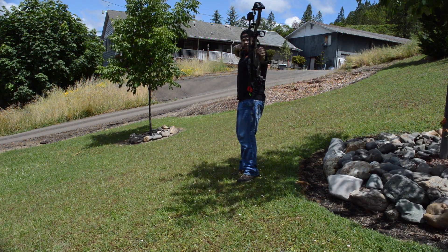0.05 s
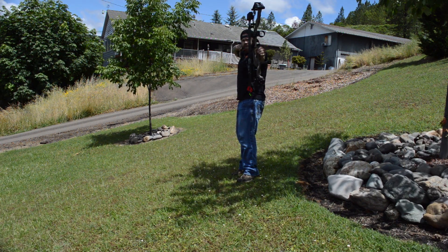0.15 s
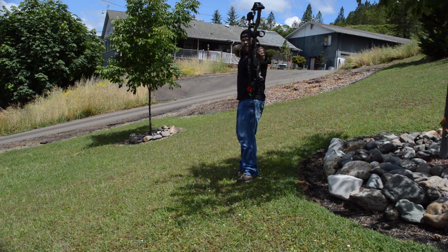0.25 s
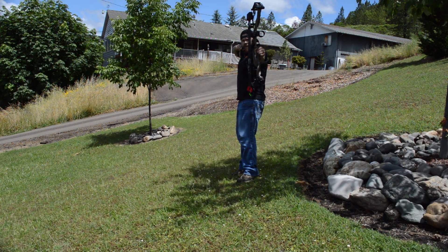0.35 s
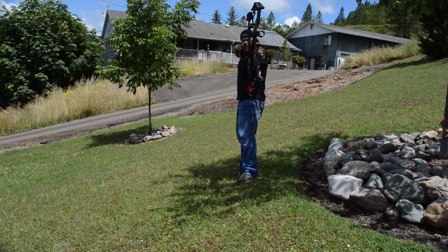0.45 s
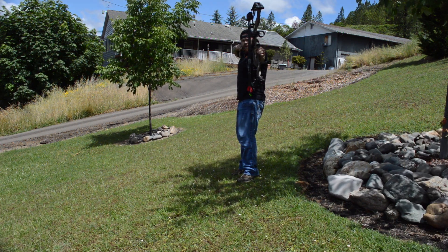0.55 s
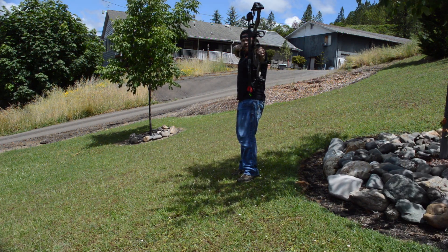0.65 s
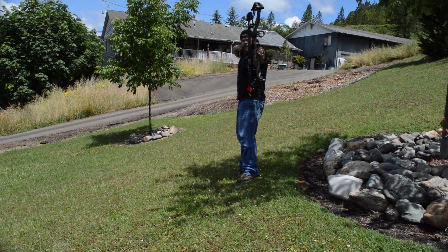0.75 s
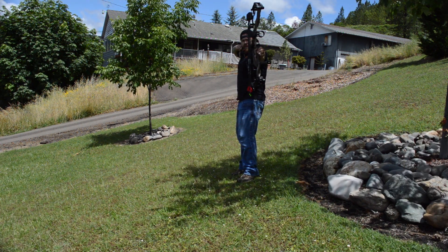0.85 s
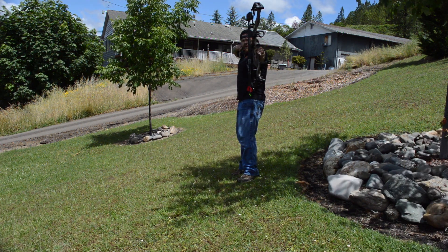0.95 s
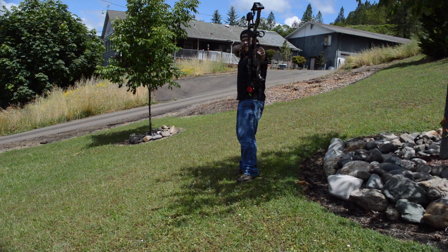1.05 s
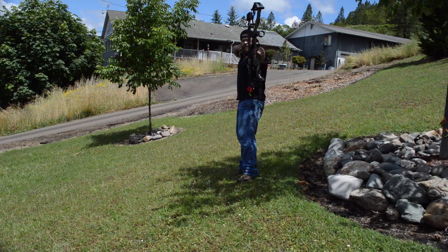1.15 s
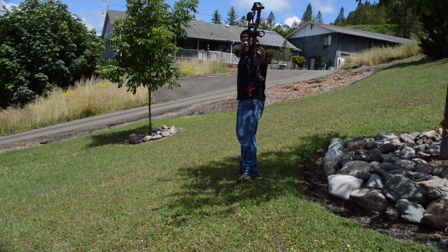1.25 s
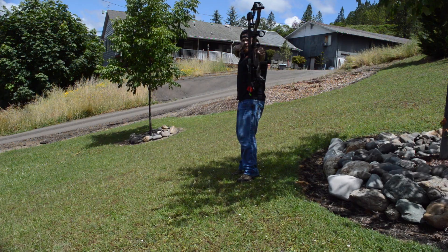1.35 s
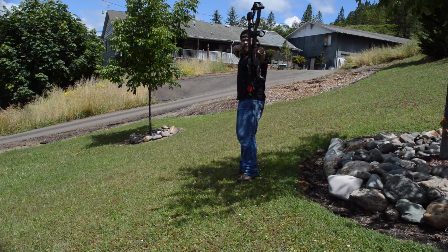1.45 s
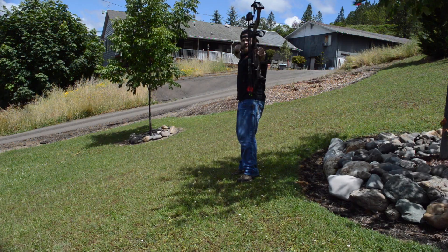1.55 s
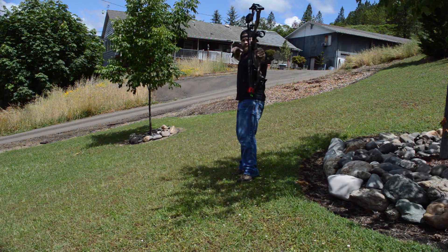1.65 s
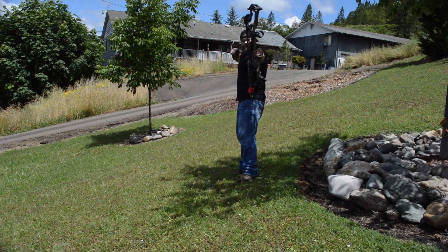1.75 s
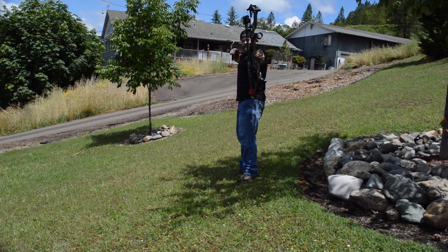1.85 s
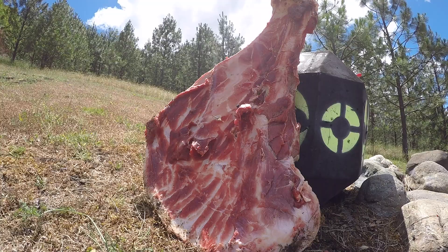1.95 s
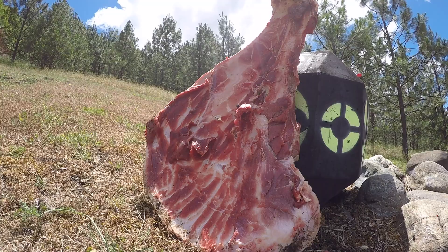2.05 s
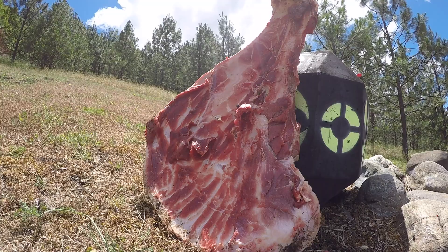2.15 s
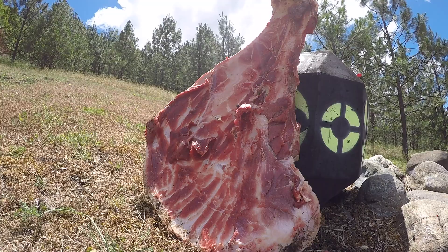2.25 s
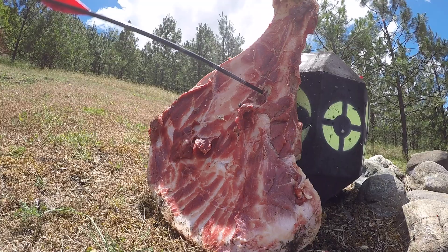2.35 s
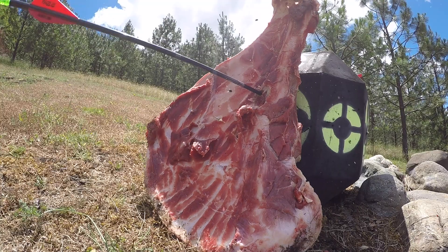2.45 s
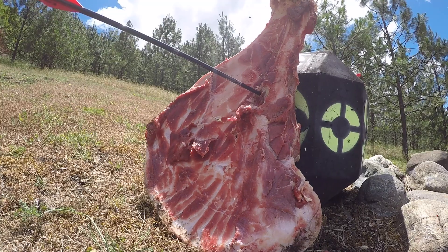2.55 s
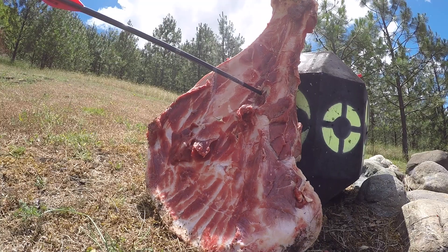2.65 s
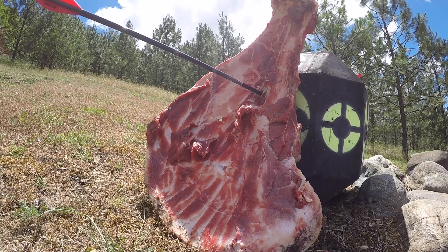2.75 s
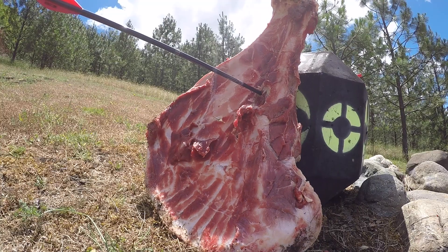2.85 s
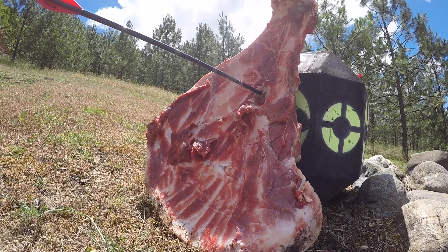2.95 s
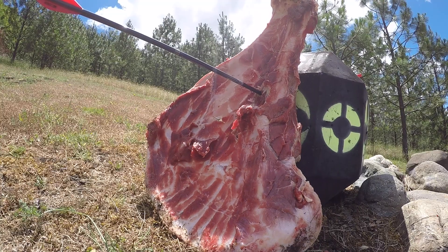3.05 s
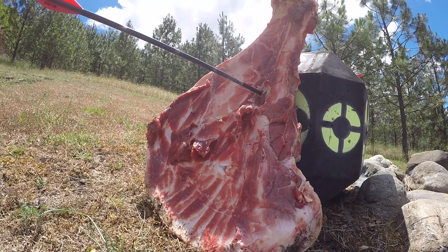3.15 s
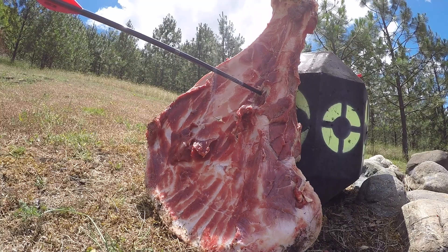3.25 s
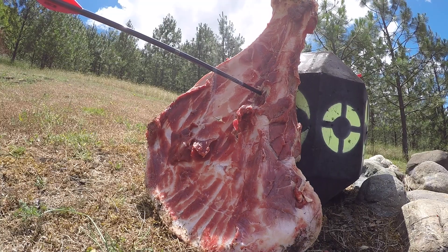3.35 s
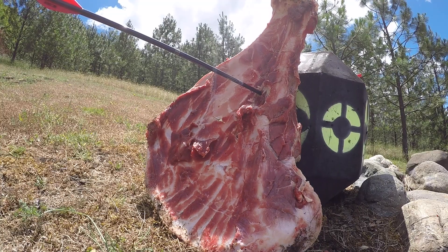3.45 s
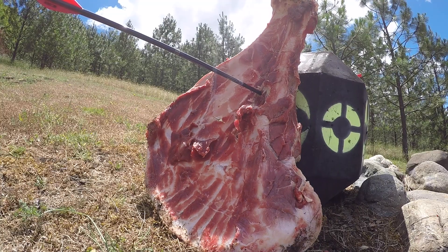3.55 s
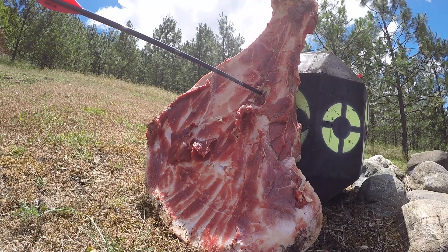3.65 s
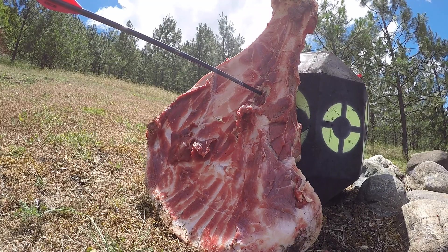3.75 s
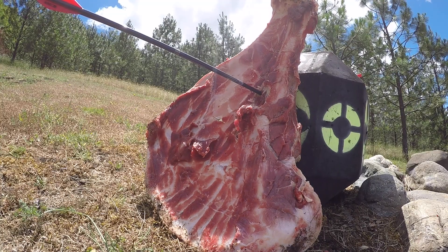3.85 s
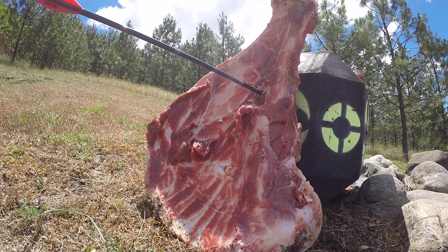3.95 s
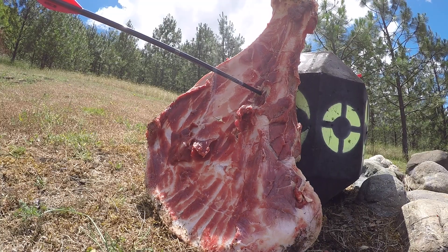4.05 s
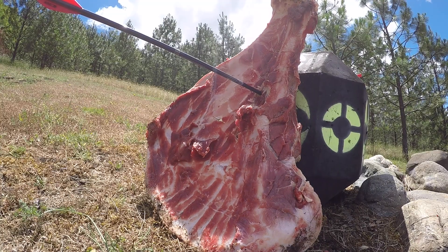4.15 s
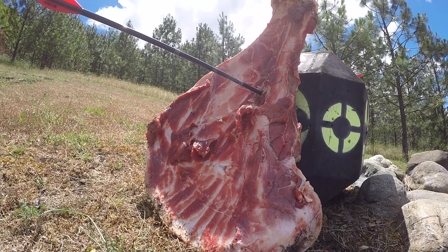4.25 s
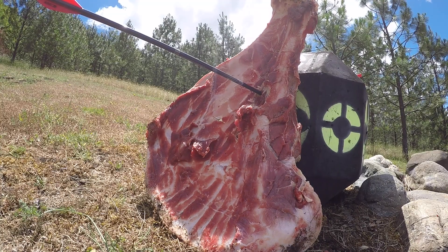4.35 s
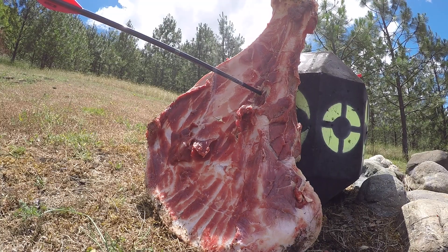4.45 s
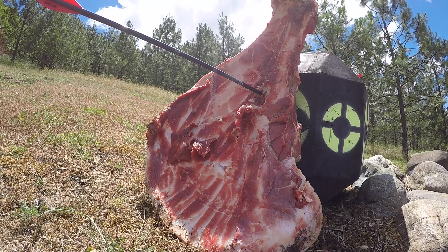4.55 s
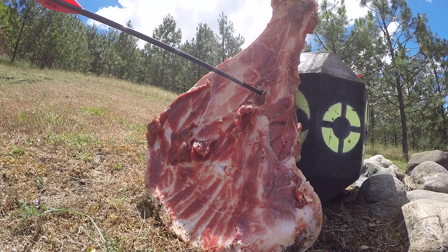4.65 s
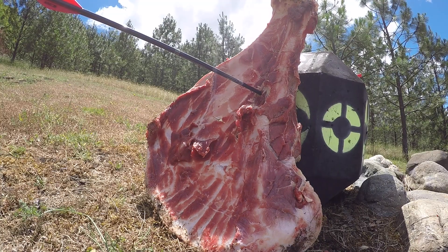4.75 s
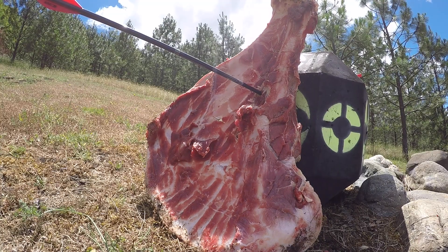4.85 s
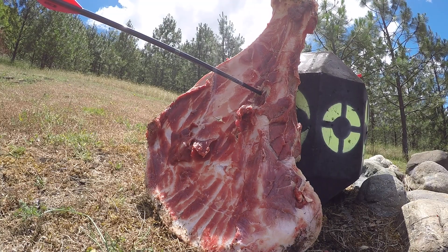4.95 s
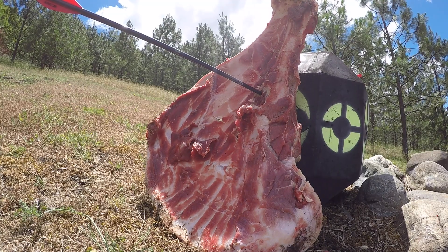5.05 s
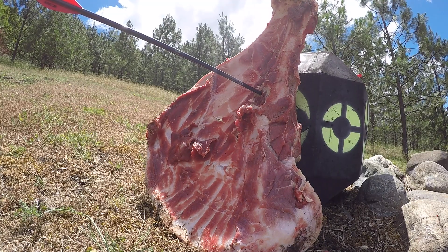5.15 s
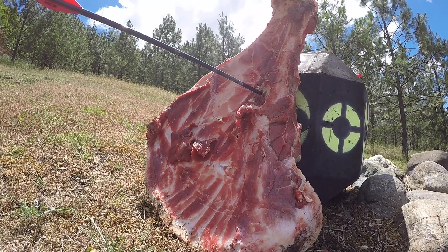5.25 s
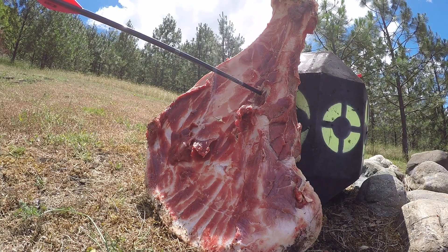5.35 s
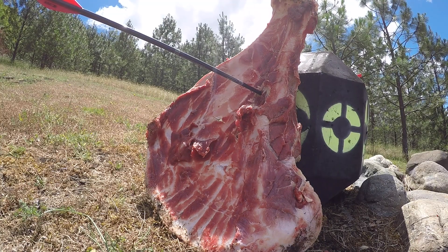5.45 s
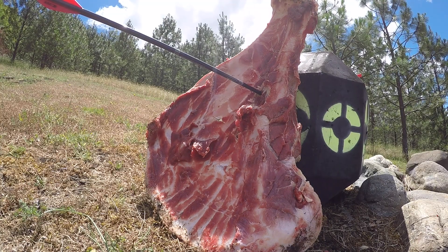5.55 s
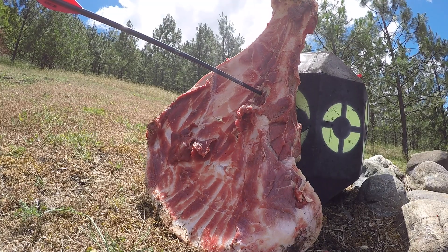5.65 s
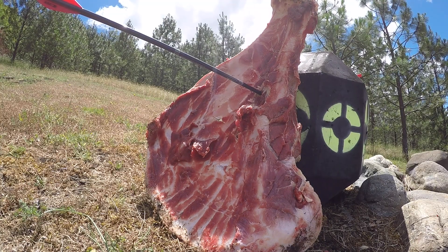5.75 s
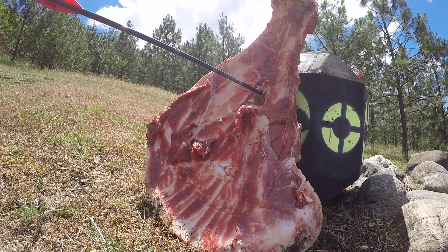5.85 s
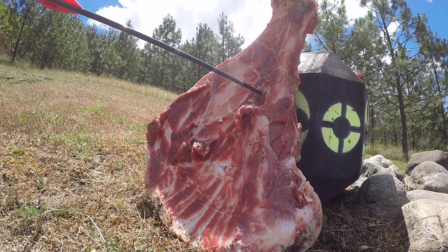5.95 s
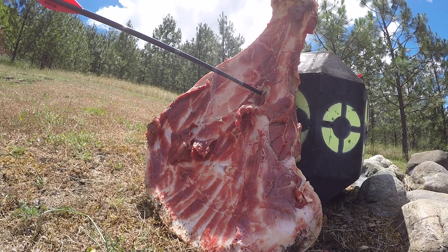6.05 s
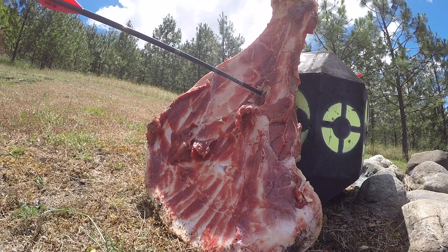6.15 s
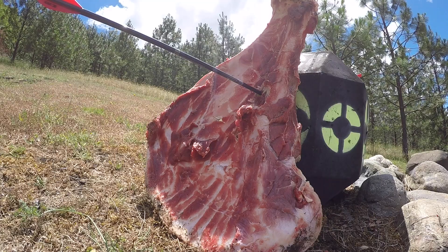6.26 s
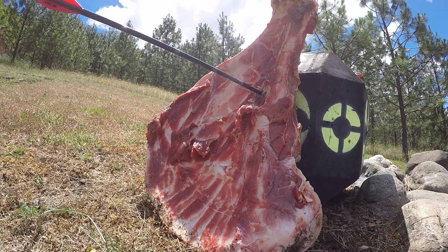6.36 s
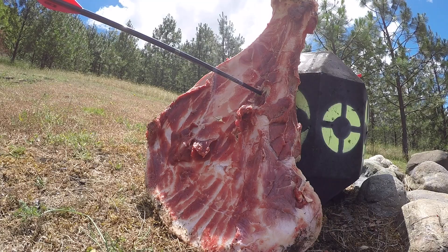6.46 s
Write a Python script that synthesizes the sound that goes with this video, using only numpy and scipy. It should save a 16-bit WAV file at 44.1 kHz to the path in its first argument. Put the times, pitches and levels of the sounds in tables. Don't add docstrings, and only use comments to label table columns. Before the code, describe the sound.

A quiet lawn opens with soft hiss and high three-pulse cricket chirps about four times a second, some fainter and farther. A tiny knock at 1.3 seconds precedes the close bow release at 1.6: a sharp clack, short ringing limbs and a tearing string whip, gone quickly. A small dry far smack comes at 2.01. At 2.03 the sound cuts to a fuller field beside the target. A faint distant release at 2.11 leads into swelling arrow hiss, then at 2.38 an enormous, clipped crack with bony ring and low fleshy thud, and a diffuse tree echo until 2.6. The background ducks and recovers by 3.2. Steady cricket shimmer continues; a fly buzzes faintly around 3.1-3.6 and 4.5-5. Faint birds whistle near 4, 4.4 and from 5.95. Low wind buffets thump the microphone, strongest from 5.1 to 6.4, continuing to the end at 6.5.

```python
import sys
import numpy as np
from scipy import signal
from scipy.fft import rfft, irfft
from scipy.io import wavfile
from scipy.ndimage import uniform_filter1d

SR = 44100
rng = np.random.default_rng(int(sys.argv[2]) if len(sys.argv) > 2 else 0)


def transcribe(signal):
    frames = np.atleast_2d(signal).T
    limited = np.clip(frames, -1, 1)
    pcm = np.round(limited * 32767).astype(np.int16)
    wavfile.write(sys.argv[1], SR, pcm)


def natural_amplitude(level_db):
    exponent = np.asarray(level_db, float) / 20
    return 10 ** exponent


N = 287091
T = np.arange(N) / SR
CUT_S, RELEASE_S, SMACK_S = 2.0315, 2.115, 2.3825
STROKE_S = .018

# (frequency [Hz], level [dB per Hz])
LAWN_COLOUR = [(15, -51), (25, -11.5), (64, -14.5), (185, -15.5), (212, -14), (476, -17.5), (714, -20),
               (818, -19.5), (1790, -23), (2220, -23), (16000, -25.5)]
# (frequency [Hz], level [dB])
HUM = [
    (60, -75),
    (120, -80),
]
# (frequency [Hz], level [dB per Hz])
FIELD_COLOUR = [(100, -1), (200, -3), (400, -10), (800, -14), (1600, -20.5), (3200, -23), (6400, -27.5),
                (9000, -32), (15000, -34.5), (15600, -50.5)]
# (time [s], level [dB])
FIELD_GAIN = [
    (2.03, -59.5),
    (2.38, -60.5),
    (2.62, -66),
    (3.0, -62),
    (3.2, -58.5),
    (6.51, -60),
]
# (centre [s], buffeting [dB], half length [s], rumble [dB])
GUSTS = [(2.12, -58, 0.19, -65), (2.44, -38, 0.028, -47), (2.54, -37.5, 0.059, -49),
         (2.67, -51.5, 0.068, -71), (2.82, -63, 0.062, -70), (3.25, -56.5, 0.1, -67),
         (3.5, -47, 0.048, -65.5), (3.76, -63, 0.057, -74.5), (4.25, -58.5, .08, -64.5),
         (4.65, -51.5, 0.037, -57), (4.92, -49.5, .04, -66), (5.075, -35, 0.035, -56),
         (5.16, -35, 0.031, -53.5), (5.21, -36, 0.011, -46), (5.245, -28, 0.027, -43.5),
         (5.34, -37, 0.037, -60), (5.44, -35, 0.049, -58.5), (5.535, -28, 0.026, -52.5),
         (5.655, -27.5, 0.044, -50.5), (5.73, -28, 0.032, -55.5), (5.825, -45, .015, -54.5),
         (5.88, -50, 0.022, -54), (5.94, -45, .02, -66), (5.99, -32.5, 0.017, -50), (6.03, -44, .02, -58),
         (6.145, -27.5, 0.026, -47), (6.21, -31, 0.043, -56), (6.36, -38.5, 0.074, -78.5),
         (6.48, -49.5, 0.045, -60)]
# (start [s], end [s])
TOP_LOST = [
    (5.2, 5.265),
    (5.585, 5.65),
    (5.695, 5.735),
    (6.12, 6.17),
]
# (time [s], peak [dB], rise [s], t60 [s], centre [Hz], width [Hz])
GROUND_ROLL = [
    (2.034, -53, 0.015, .4, 209, 220),
    (2.12, -52, 0.011, .45, 200, 200),
    (2.42, -44.5, .004, .15, 200, 120),
    (2.5, -48.5, .02, .35, 210, 140),
]

# (time [s], level [dB])
CHORUS_LEVEL = [(2.03, -67), (2.3, -67), (2.6, -76.5), (2.8, -74.5), (2.95, -77.5), (3.05, -72), (3.3, -69),
                (4.6, -67.5), (6.51, -67)]
# (first stroke [s], level [dB])
CHIRPS = [(-.021, -64.5), (.251, -64), (.513, -64), (.77, -61), (1.04, -63.5), (1.295, -64), (1.714, -63.5),
          (1.962, -65.5)]
# (first stroke [s], level [dB], pitch [Hz])
NEIGHBOUR = [
    (.085, -70.5, 5460),
    (.414, -66, 5470),
    (.785, -71, 5580),
    (1.312, -74, 5300),
]
# (stroke [s], level [dB], pitch [Hz])
CLOSE_STROKES = [
    (2.095, -57, 5138),
    (2.154, -52, 5280),
    (2.17, -67, 5400),
]
# (time [s], length [s], from [Hz], to [Hz], level [dB])
BIRD_NOTES = [(0, .065, 4280, 3020, -77), (3.922, .022, 3950, 3950, -73), (3.97, .045, 3450, 3450, -72.5),
              (4.018, 0.031, 3400, 3480, -67), (4.047, 0.03, 3560, 3540, -71.5),
              (3.983, .045, 3346, 2950, -73), (4.045, .035, 2950, 3050, -75),
              (4.32, 0.032, 2460, 2460, -76), (4.42, .03, 2350, 2560, -78), (4.447, .025, 2944, 2795, -78),
              (5.952, .035, 4600, 3150, -69.5), (5.986, .15, 3200, 3160, -71.5),
              (6.168, .015, 3300, 3250, -73), (6.305, .03, 3010, 3080, -68), (6.487, .03, 3780, 3670, -69)]
# (time [s], pitch [Hz], level [dB])
BIRD_SLUR = [(4.065, 3410, -90), (4.08, 3020, -75), (4.095, 2680, -73.5), (4.115, 2520, -77),
             (4.145, 2550, -77), (4.16, 2680, -73.5), (4.177, 2980, -75), (4.192, 3400, -90)]
# (time [s], wing beat [Hz], level [dB])
FLY_PASSES = [
    [(2.95, 228.7, -88.5), (3.1, 227.8, -80.5), (3.21, 228, -74.5), (3.275, 225, -83), (3.33, 221, -71),
     (3.42, 215.4, -74), (3.47, 219, -78.5), (3.53, 223, -72.5), (3.7, 223.7, -88)],
    [(4.42, 216.7, -89), (4.52, 218.2, -76.5), (4.61, 217, -76.5), (4.66, 225.4, -74.5), (4.72, 231.3, -76),
     (4.77, 223, -84), (4.85, 227, -76), (4.9, 222, -83), (4.96, 215.3, -76.5), (5.05, 214, -90)],
]
WING_PARTIALS_DB = [0, 6, -1, -1.5, 0, 0, -6, -5, -10]

# (time [s], peak [dB], rise [s], t60 [s], centre [Hz], width [Hz])
BOW_NEAR = [(1.308, -56.5, .001, .03, 930, 600), (1.5765, -44, 0.00034, 0.008, 6000, 14000),
            (1.577, -47.5, 0.0026, 0.18, 2900, 12100), (1.587, -50, .001, .02, 8500, 1500),
            (1.5958, -33, 0.00067, 0.033, 2500, 5000), (1.598, -18, 0.00047, 0.019, 3000, 7000),
            (1.602, -24, 0.0007, 0.045, 1210, 1500), (1.688, -54.5, 0.0022, .06, 4000, 7000),
            (1.74, -46.5, .0006, 0.047, 1060, 1500), (1.74, -53, .0004, 0.014, 2700, 2200),
            (1.6, -41, .002, 0.071, 400, 300), (1.598, -37.5, 0.0018, 0.051, 124, 110),
            (1.62, -59.5, 0.057, 0.89, 1110, 2200), (1.78, -60, 0.00802, 0.12965, 750, 400)]
# (time [s], peak [dB], rise [s], t60 [s], centre [Hz], width [Hz])
STRING_SLAP = [
    (1.6025, -31.5, .001, .035, 7000, 6000),
    (1.6102, -38, .0004, 0.012, 2200, 3000),
    (1.607, -39, .001, .03, 4200, 2000),
    (1.628, -38, .002, 0.036, 3000, 1500),
    (1.637, -39, .004, 0.046, 7200, 2500),
    (1.646, -53, .003, 0.041, 1200, 1500),
]
# (time [s], frequency [Hz], level [dB], rise [s], t60 [s], first swing [+1/-1])
LIMBS_NEAR = [(1.6005, 776, -15, 0.0027, 0.026, 1), (1.6015, 1454, -14.5, 0.0028, 0.03, -1),
              (1.6, 1063, -19, 0.0023, 0.039, 1), (1.598, 635, -21.5, .001, 0.034, 1),
              (1.598, 320, -26, 0.0012, 0.044, 1), (1.598, 2190, -27, .0005, .045, -1),
              (1.6, 1741, -31.5, .001, .05, 1), (1.598, 2800, -28, .0005, 0.042, 1),
              (1.598, 967, -30.5, 0.0011, .035, -1), (1.602, 1209, -24, .002, .025, 1),
              (1.599, 1200, -19, 0.0009, 0.025, 1), (1.6095, 1800, -30, .0008, .025, -1),
              (1.626, 3500, -38, .004, 0.046, 1), (1.598, 3400, -22, .0004, .02, 1)]
# (time [s], level [dB])
WHIP_LEVEL = [(1.6, -41), (1.612, -40), (1.626, -35), (1.635, -39.5), (1.646, -51), (1.66, -58.5),
              (1.7, -64), (1.76, -73)]
# (frequency [Hz], level [dB per Hz])
WHIP_COLOUR = [(88, -49), (150, -23), (275, -2), (923, -10.5), (1080, -4.5), (1240, -12), (2180, -9.5),
               (2400, -10.5), (16000, -19)]
# (time [s], peak [dB], rise [s], t60 [s], centre [Hz], width [Hz])
HIT_FAR = [
    (2.0125, -32, 0.0002746, 0.0095, 4030, 9000),
    (2.0125, -38.5, 0.00041, 0.02, 900, 2010),
    (2.0165, -52, 0.0005916, 0.0297, 4500, 3000),
    (2.0255, -36, 0.0018, 0.046, 4400, 2200),
    (2.027, -49, 0.002, .05, 9000, 9000),
]
# (time [s], frequency [Hz], level [dB], rise [s], t60 [s], first swing [+1/-1])
BONE_FAR = [
    (2.0126, 2680, -28, 0.00028, 0.0067, -1),
    (2.0126, 4310, -14.5, 0.00026, 0.0042, -1),
    (2.0126, 7700, -28.5, 0.00022, 0.0053, 1),
    (2.0126, 7460, -39, 0.00024, 0.0093, 1),
    (2.0126, 13500, -32.5, .0003, .006, 1),
    (2.0126, 5780, -28.5, .0002, .007, 1),
]

# (time [s], peak [dB], rise [s], t60 [s], centre [Hz], width [Hz])
BOW_FAR = [
    (2.1132, -45, 0.001, 0.094, 2770, 5894),
    (2.1135, -50, .0007, .03, 9500, 8000),
    (2.114, -43, 0.0017, 0.036, 248, 410),
    (2.145, -53, 0.0038, 0.073, 1493, 900),
    (2.255, -58, .002, 0.033, 1090, 900),
    (2.16, -56, .003, .04, 3500, 4900),
    (2.25, -59, 0.0066, .1, 3235, 400),
]
# (time [s], frequency [Hz], level [dB], rise [s], t60 [s], first swing [+1/-1])
LIMBS_FAR = [(2.114, 716, -42.5, .002, .045, 1), (2.1142, 1502, -40.5, .001, .04, -1),
             (2.1135, 1100, -44, .001, .035, 1), (2.116, 3295, -40, .001, .03, 1),
             (2.114, 2890, -41, .0007, .03, -1), (2.113, 100, -27.5, .003, .04, -1),
             (2.254, 680, -49, .002, .04, 1), (2.254, 1060, -45, .002, .04, 1),
             (2.254, 1490, -47, .002, .035, -1), (2.143, 2200, -56, .02, .25, 1),
             (2.114, 2073, -42, .001, .03, 1), (2.115, 2610, -43, .001, .03, -1),
             (2.117, 3945, -44, .001, .035, 1), (2.114, 4313, -46, .0007, .03, -1),
             (2.114, 5265, -45, .001, .035, 1), (2.114, 6380, -44, .0007, .02, -1),
             (2.1135, 8247, -44, .0007, .02, 1), (2.1135, 8750, -45, .0007, .02, -1)]
# (frequency [Hz], level [dB per Hz])
FLIGHT_COLOUR = [(240, -27), (400, -2.5), (553, -12), (645, -4.5), (1510, -9.5), (1630, -11), (7170, -8.5),
                 (14600, -19.5), (16000, -35)]
# (time [s], peak [dB], rise [s], t60 [s], centre [Hz], width [Hz])
HIT_NEAR = [(2.3824, 5, 0.00035, 0.01, 3980, 4000), (2.3824, 1.5, .0008, 0.0091, 11200, 8003),
            (2.386, -5, 0.00045, 0.005, 4500, 7000), (2.3826, -5.5, 0.00032, 0.013, 1510, 700),
            (2.3905, -23, .0004, .009, 2800, 2500), (2.393, -22, .0004, .009, 4200, 3500),
            (2.394, -33, .001, .025, 2000, 2000), (2.4025, -38, .0004, .008, 3500, 4000),
            (2.409, -34.5, .002, 0.024, 4700, 1800), (2.436, -45.5, .002, .03, 1750, 400),
            (2.463, -48, .002, .025, 2700, 600), (2.65, -60.5, .04, 0.46, 4250, 1500),
            (2.73, -61, .02, .4, 3890, 1499)]
# (time [s], frequency [Hz], level [dB], rise [s], t60 [s], first swing [+1/-1])
SLAB = [(2.3843, 215, 4, .0023, .045, -1), (2.3876, 44, 3.6, .003, .05, 1), (2.376, 14, -7, .001, .1, -1),
        (2.3831, 341, 4, .018, .04, -1), (2.3845, 443, -11.5, .0005, .03, 1),
        (2.384, 950, -18, .001, .03, 1), (2.384, 750, -14, .001, .02, 1), (2.384, 575, -24, .001, .02, -1),
        (2.384, 1200, -6.5, .0005, .02, 1), (2.401, 41, -19, .008, .25, -1),
        (2.3975, 95, -15, .0015, .03, -1), (2.3875, 125, -17, .003, .06, 1),
        (2.384, 1340, -19, .0005, .015, -1)]
# (time [s], frequency [Hz], level [dB], rise [s], t60 [s], first swing [+1/-1])
BONE_NEAR = [(2.3824, 2417, 3, 0.00037, 0.013, 1), (2.3824, 3310, 2.5, 0.00028, 0.013, -1),
             (2.3825, 4334, 5, .0003, 0.011, 1), (2.3829, 4150, -0.5, 0.00033, 0.01, 1),
             (2.3825, 5410, 3, 0.00026, 0.014, -1), (2.3825, 6320, 1, .0003, 0.014, 1),
             (2.3825, 7420, 2, .0003, 0.013, -1), (2.3826, 2660, -5, .0004, 0.013, -1),
             (2.3826, 1870, -9, .0003, 0.011, -1), (2.3826, 8114, 1, 0.00026, 0.011, 1),
             (2.3825, 6010, -2.5, .0003, 0.013, -1), (2.3826, 3630, -8, .0003, 0.0058, 1),
             (2.3826, 9200, -5, .0005, 0.013, 1), (2.3826, 13900, -2, .0006, .007, -1),
             (2.3826, 12700, -5.5, .0006, .01, 1), (2.3826, 4900, -3, .0003, 0.0085, -1)]
# (time [s], level [dB])
ECHO_LEVEL = [
    (2.4, -53),
    (2.42, -49.5),
    (2.58, -52),
    (2.62, -68.5),
    (2.7, -83),
]
# (frequency [Hz], level [dB per Hz])
ECHO_COLOUR = [(88, -29), (150, -2), (240, -2), (422, -13.5), (494, -11), (637, -17.5), (1720, -15.5),
               (10400, -26), (14800, -34), (16000, -48)]


def column(table, k=1, outside=-150.):
    rows = np.array(table, float)
    return np.interp(T, rows[:, 0], rows[:, k], left=outside, right=outside)


def walk(rate):
    hold = max(int(SR / rate), 1)
    steps = rng.standard_normal(N + 1)[:N // hold + 1]
    return 1.2 * uniform_filter1d(np.repeat(steps, hold)[:N], hold)


def coloured(shape, flicker_db=0., rate=10.):
    hz = np.maximum(np.arange(N // 2 + 1) * SR / N, 1)
    rows = np.array(shape, float)
    level_db = np.interp(np.log(hz), np.log(rows[:, 0]), rows[:, 1], left=-80, right=-90)
    spectrum = rfft(rng.standard_normal(N)) * natural_amplitude(level_db)
    if flicker_db:
        out = np.zeros(N)
        for octave in range(4, 15):
            share = np.clip(1 - abs(np.log2(hz) - octave), 0, 1)
            out += irfft(spectrum * share, N) * natural_amplitude(flicker_db * walk(rate))
    else:
        out = irfft(spectrum, N)
    return out / np.std(out)


def add(out, s, piece):
    i = max(int(s * SR), 0)
    out[i:i + len(piece)] += piece[:max(N - i, 0)]


def swell(rise, t60, size=22050):
    t = np.arange(size) / SR
    return t, (1 - np.exp(-t / rise)) * 1000. ** (-t / t60)


def scattered(x, rise, t60, size):
    scatter = rng.standard_normal(size) * swell(rise, t60, size=size)[1]
    return signal.fftconvolve(x, scatter / np.linalg.norm(scatter))[:N]


def knocks(table):
    out = np.zeros(N)
    for s, db, rise, t60, hz, width in table:
        b, a = signal.iirpeak(hz, hz / width, SR)
        noise = signal.lfilter(b, a, rng.standard_normal(16000))
        noise = signal.lfilter(b, a, noise)[1000:]
        fade = swell(rise, t60, size=len(noise))[1]
        add(out, s, natural_amplitude(db) * noise / np.std(noise) * fade)
    return out


def rings(table):
    out = np.zeros(N)
    for s, hz, db, rise, t60, sign in table:
        t, fade = swell(rise, t60)
        add(out, s, np.sign(sign) * natural_amplitude(db) * fade * np.sin(2 * np.pi * hz * t))
    return out


def mains_hum():
    hum = np.zeros(N)
    for hz, db in HUM:
        hum += np.sqrt(2) * natural_amplitude(db + 1.7 * walk(6.1)) * np.sin(2 * np.pi * hz * T)
    return hum


def lawn_noise():
    hiss = natural_amplitude(-67.5) * coloured(LAWN_COLOUR)
    return hiss + natural_amplitude(-80.5) * coloured([(4600, -15), (5300, -15.0), (5900, -16.5)])


def field_noise():
    return natural_amplitude(column(FIELD_GAIN)) * coloured(FIELD_COLOUR, flicker_db=-0.3, rate=8.0)


def wind():
    push, rough = natural_amplitude(column(FIELD_GAIN) + 3.5), natural_amplitude(column(FIELD_GAIN) - 1)
    for s, db, half, rumble_db in GUSTS:
        gust = np.exp(-abs(np.arange(-2 * half, 2 * half, 1 / SR) / half) ** 3)
        add(push, s - 2 * half, natural_amplitude(db) * gust)
        add(rough, s - 2 * half, natural_amplitude(rumble_db) * gust)
    buffet = coloured([(15, -10), (25, -1), (45, 0), (62, -5.5), (88, -22)])
    power = uniform_filter1d(uniform_filter1d(buffet ** 2, size=1200), size=1200)
    buffet = buffet / np.sqrt(0.33 + power)
    rumble_colour = [(55, -10.5), (78, -1), (120, -3), (170, -12), (280, -27)]
    rumble = coloured(rumble_colour, flicker_db=4, rate=25)
    return push * buffet + rough * rumble


def crickets(strokes, fall_hz):
    out, t = np.zeros(N), np.arange(int(STROKE_S * SR)) / SR
    for s, db, hz in strokes:
        pitch_hz = hz + fall_hz * (.36 - (t / STROKE_S) ** 1.8)
        tone = np.sin(2 * np.pi * np.cumsum(pitch_hz) / SR)
        add(out, s - STROKE_S / 2, 1.3 * natural_amplitude(db) * np.sin(np.pi * t / STROKE_S) ** .7 * tone)
    blurred = scattered(out, .003, 0.13, 2000)
    return out * natural_amplitude(walk(200)) + .3 * blurred


def chorus(count=9):
    strokes = []
    for start, pace, hz, far in rng.random((count, 4)):
        for s in np.arange(CUT_S - .3 * start, N / SR, .2 + .12 * pace):
            strokes += [(s + .034 * k, -8 * far, 5120 + 420 * hz) for k in range(3 + int(2 * pace))]
    near = crickets(strokes, fall_hz=650)
    high_period_s = .253
    starts = np.arange(4.83 - 9 * high_period_s, N / SR, high_period_s)
    high = crickets([(s + .022 * k, -5.5, 5900) for s in starts for k in range(5)], fall_hz=220)
    blur = coloured([(4500, -25.5), (4950, -6.5), (5400, -2.0), (5700, -4.5), (6000, -22.5)])
    swell_db = 0.43 * np.cos(2 * np.pi * (T - 4.8) / .5)
    mix = .65 * near / np.std(near[T > CUT_S]) + 0.76 * blur + high
    return natural_amplitude(column(CHORUS_LEVEL) + swell_db) * mix


def near_crickets():
    lawn = [(s + k * .0355, db, 5190 + k * 20) for s, db in CHIRPS for k in range(3)]
    lawn += [(s - .028, db - 6, 5190) for s, db in CHIRPS[1:6:2]]
    lawn += [(s + k * .0325, db, hz) for s, db, hz in NEIGHBOUR for k in range(3)]
    lawn = [row for row in lawn if 0 < row[0] < CUT_S - STROKE_S / 2]
    return crickets(lawn + list(CLOSE_STROKES), fall_hz=850)


def bird():
    settle_s, fade_db_per_s, warble_hz, warbles_per_s = .014, 43, 60, 51
    out = np.zeros(N)
    for s, length, from_hz, to_hz, db in BIRD_NOTES:
        part = np.arange(int(length * SR)) / (length * SR)
        t = part * length
        glide_hz = to_hz + (from_hz - to_hz) * np.exp(-t / settle_s)
        pitch_hz = glide_hz + warble_hz * np.sin(2 * np.pi * warbles_per_s * t)
        level = np.sqrt(2) * natural_amplitude(db - fade_db_per_s * t) * np.sin(np.pi * part) ** 0.28
        add(out, s, level * np.sin(2 * np.pi * np.cumsum(pitch_hz) / SR))
    slur_phase = 2 * np.pi * np.cumsum(column(BIRD_SLUR, outside=0.)) / SR
    out = out + np.sqrt(2) * natural_amplitude(column(BIRD_SLUR, k=2)) * np.sin(slur_phase)
    smeared = scattered(out, .005, .15, 6000)
    return out * natural_amplitude(1.5 * walk(60)) + .6 * smeared


def fly():
    out = np.zeros(N)
    for path in FLY_PASSES:
        beat_hz = column(path, outside=0.) * (1 + .006 * walk(40))
        phase = 2 * np.pi * np.cumsum(beat_hz) / SR
        stack = np.zeros(N)
        for k, db in enumerate(WING_PARTIALS_DB, start=1):
            stack += natural_amplitude(db + 2.2 * walk(17)) * np.sin(k * phase + k * k)
        out += np.sqrt(2) * natural_amplitude(column(path, k=2)) * stack
    return out


def echo():
    return natural_amplitude(column(ECHO_LEVEL)) * coloured(ECHO_COLOUR, flicker_db=-0.5, rate=70)


def near_bow():
    whip = natural_amplitude(column(WHIP_LEVEL) + 1.5) * coloured(WHIP_COLOUR, flicker_db=2.2, rate=320)
    return whip + knocks(BOW_NEAR) + rings(LIMBS_NEAR)


def far_bow():
    return knocks(BOW_FAR) + rings(LIMBS_FAR)


def arrow():
    left = np.maximum(SMACK_S - T, 0)
    last_metre_s = .01
    near = last_metre_s / (last_metre_s + left)
    vane_level = np.hypot(natural_amplitude(-42.5) * near, natural_amplitude(-60.5))
    vanes = vane_level * coloured(FLIGHT_COLOUR, flicker_db=3.0, rate=65)
    edge_hz = np.minimum(7400 + 85000 * left, 15000)
    thin = np.zeros(N)
    for hz in range(6000, 16000, 1500):
        band = coloured([(hz - 1500, -30), (hz - 700, 0), (hz + 700, 0), (hz + 1500, -30)])
        thin += np.clip((hz - edge_hz) / 1500 + 1, 0, 1) * hz / 12000 * band
    thin_level = .5 * natural_amplitude(-42 - 40 * left) * near
    whistle_hz = np.minimum(6400 + 5500 * left, 7600)
    tone = np.sin(2 * np.pi * np.cumsum(whistle_hz) / SR)
    whistle = natural_amplitude(-62 - 55 * abs(left - .07)) * walk(500) * tone
    return (vanes + thin_level * thin + whistle) * ((T > RELEASE_S) & (T < SMACK_S))


def far_smack():
    return knocks(HIT_FAR) + rings(BONE_FAR)


def near_smack():
    return knocks(HIT_NEAR) + rings(SLAB) + rings(BONE_NEAR)


def lose_top_band(x):
    duck_s, return_s = 2.62, .25
    top = signal.sosfiltfilt(signal.butter(10, 13200, "high", fs=SR, output="sos"), x)
    lost = sum(1. * ((T > start) & (T < end)) for start, end in TOP_LOST)
    out = x - top * uniform_filter1d(lost, size=300)
    for hz in range(12750, 15450, 150):
        band = signal.butter(6, [hz, hz + 150], "band", fs=SR, output="sos")
        strip = signal.sosfiltfilt(band, out)
        delay_s = max(hz - 13600, 0) / 6000 * .5
        odds = np.exp(-np.maximum(T - duck_s - delay_s, 0) / return_s) * (.6 + .5 * (hz > 13600))
        held = np.repeat(rng.random(N // 2048 + 1), 2048)[:N]
        out = out - strip * uniform_filter1d(1. * ((held < odds) & (T > duck_s)), size=600)
    return out


def lawn_camera(wildlife):
    return mains_hum() + near_bow() + far_smack() + lawn_noise() + wildlife


def target_camera(wildlife):
    shot = echo() + far_bow() + arrow() + near_smack()
    heard = shot + field_noise() + wind() + chorus() + fly() + wildlife
    overloaded = np.clip(lose_top_band(heard), -.94, .94)
    return signal.sosfilt(signal.ellip(7, .5, 45, 15250, fs=SR, output="sos"), overloaded)


def scene():
    wildlife = near_crickets() + bird()
    lawn, target = lawn_camera(wildlife), target_camera(wildlife)
    lawn = lawn + knocks(STRING_SLAP)
    lawn = signal.sosfilt(signal.ellip(10, .3, 60, 15850, fs=SR, output="sos"), lawn)
    return np.where(T < CUT_S, lawn, target + knocks(GROUND_ROLL))[None]


def roll_off(x):
    return signal.sosfilt(signal.butter(12, 16070, fs=SR, output="sos"), x)


def record(dry):
    finished = np.clip(dry, -1, 1)
    return roll_off(finished)


dry = scene()
out = record(dry)
transcribe(out)
```